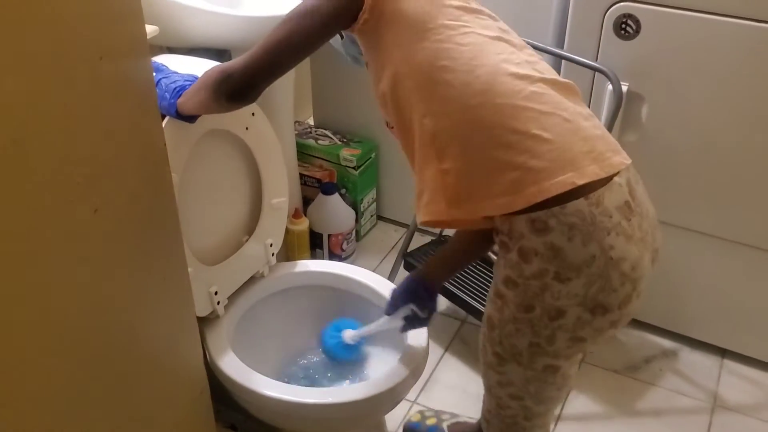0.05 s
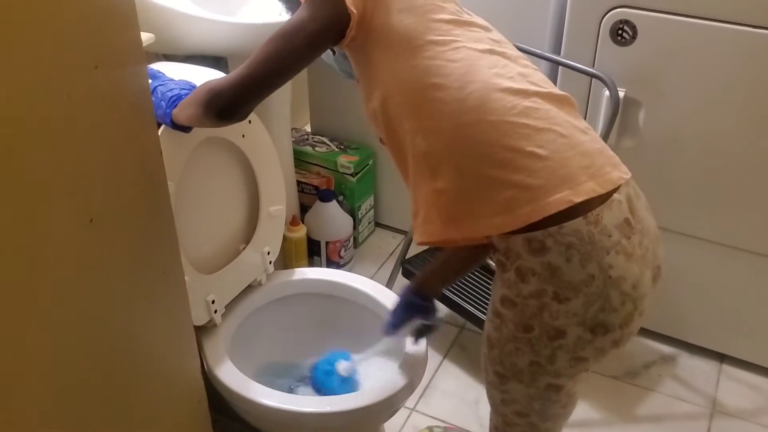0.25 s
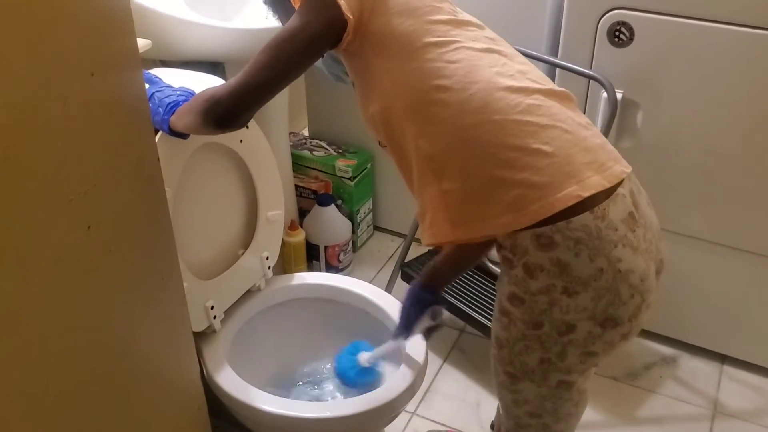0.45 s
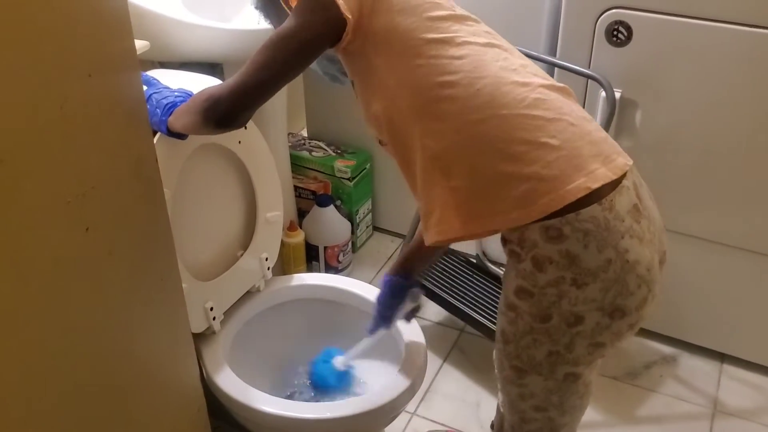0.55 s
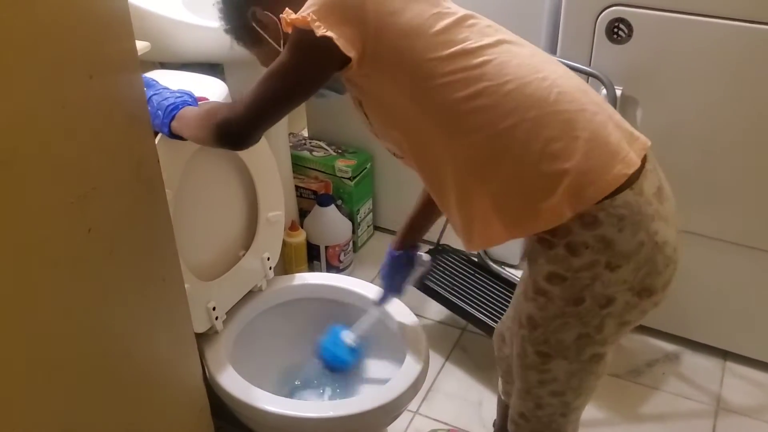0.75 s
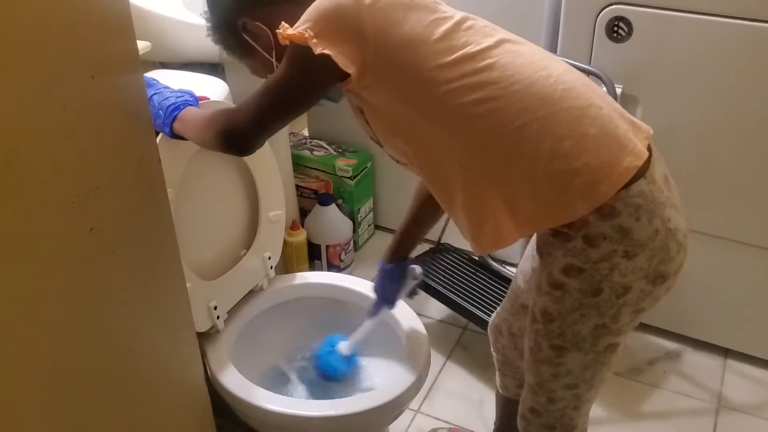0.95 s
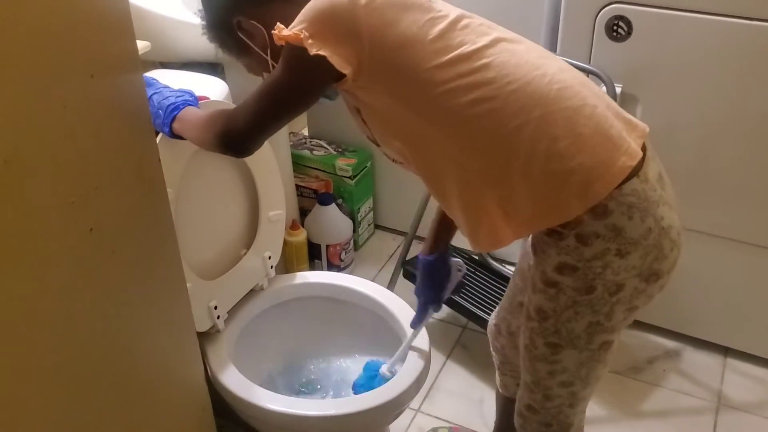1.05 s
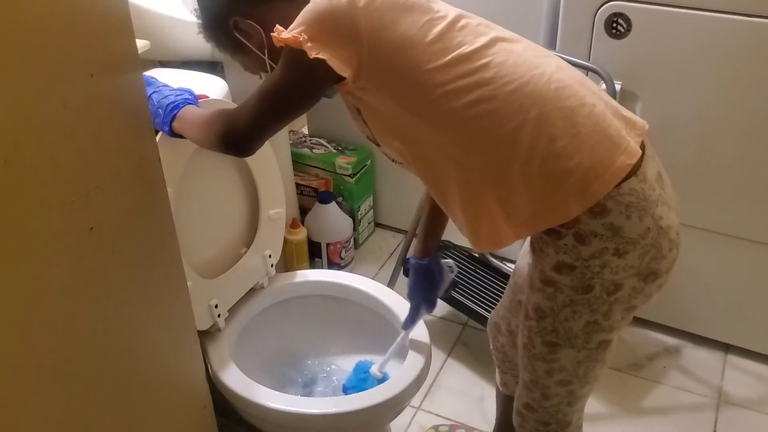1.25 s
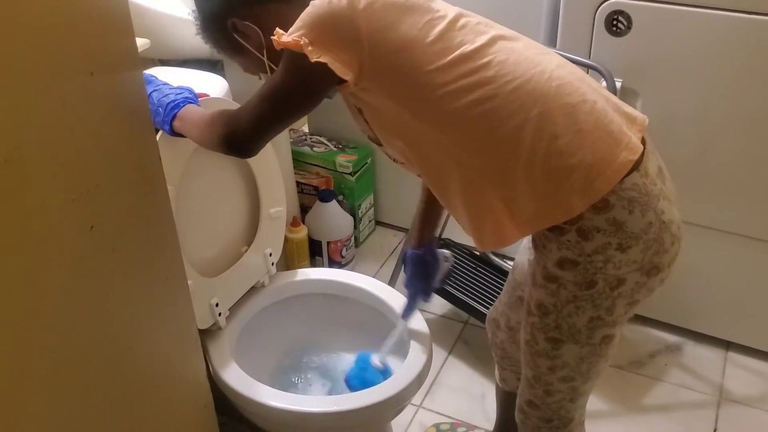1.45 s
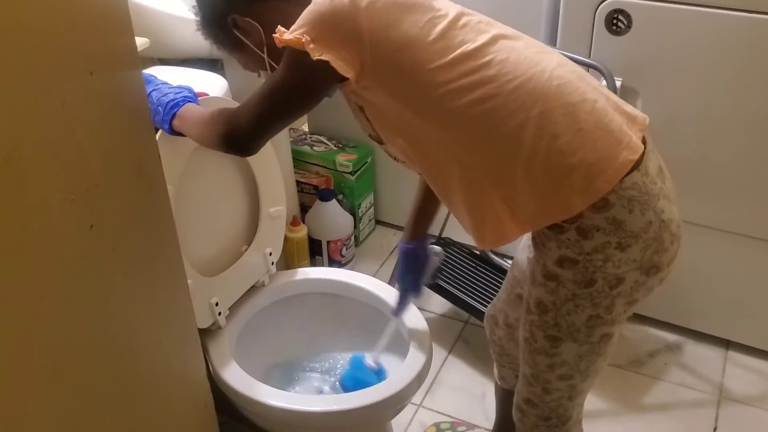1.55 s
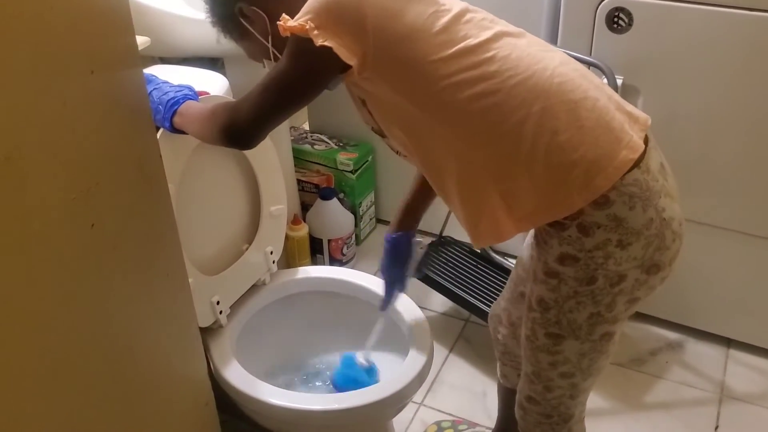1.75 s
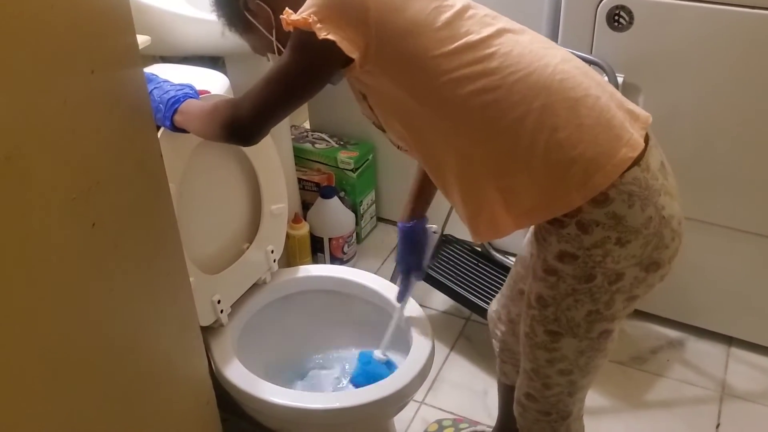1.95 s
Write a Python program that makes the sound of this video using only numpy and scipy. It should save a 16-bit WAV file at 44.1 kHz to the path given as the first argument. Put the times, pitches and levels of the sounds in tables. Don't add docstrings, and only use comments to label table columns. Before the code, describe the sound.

A stiff brush scrubs a wet toilet bowl, bristles hissing and scraping over lapping water and faint room rumble. The stem glances off the rim at 0.2 s; a sharp, loud knock rings the porcelain at 0.4 s. Duller hollow knocks, ticks and a plop come near 0.86 and 1.1 s. Longer, steadier strokes continue to 2 s, with light taps around 1.55 and drops near 1.73 s. Close, with short hard-walled reflections.

```python
import sys
import numpy as np
from scipy import signal
from scipy.fft import rfft, irfft, next_fast_len
from scipy.io import wavfile

SR = 44100
rng = np.random.default_rng(int(sys.argv[2]) if len(sys.argv) > 2 else 0)


def materialize(psi):
    bounded = np.clip(np.atleast_2d(psi).T, -1, 1)
    quanta = np.round(bounded * 32767).astype(np.int16)
    wavfile.write(sys.argv[1], SR, quanta)


def rack_gain(trim_db):
    fader = np.asarray(trim_db, float)
    return 10 ** (fader / 20)


N = 88200

# pitch_hz, level_db
STEADY_SPECTRUM = [(20, -20), (58, 3), (120, -4.5), (200, -10.5), (400, -20.5), (900, -26), (1500, -8.5),
                   (2600, -2.5), (5500, -11), (7800, -23), (12000, -20.5), (15000, -21)]
# start_s, level_db, pitch_hz, length_cycles
THUMPS = [(.12, -61, 187.5, 160), (.24, -49, 183.5, 60), (.26, -40.5, 65, 15.3), (0.329, -47.5, 176, 29),
          (0.41, -39, 187.4, 25.7), (0.43, -33, 52, 8.4), (0.588, -39.5, 160, 8.9), (.62, -44, 63.5, 8.9),
          (0.644, -41.5, 313, 5.8), (.76, -56.5, 97.4, 40), (0.861, -45.5, 83.4, 14),
          (0.862, -32, 191, 11.4), (.862, -35, 335, 18), (.89, -47, 260, 17.5), (1.099, -44.5, 56.4, 15.4),
          (1.229, -51, 57.4, 11)]
# time_s, level_db
WASH = [(0, -58), (.1, -69), (.3, -65.5), (.56, -60.5), (.76, -70), (.82, -86), (.9, -61), (1.02, -64),
        (1.15, -59.5), (1.33, -64), (1.38, -82), (1.53, -78), (1.6, -61), (1.7, -80), (1.78, -75), (2, -68)]
# start_s, level_db, pitch_hz, length_cycles
DROPS = [(.006, -41, 810, 35), (.02, -37, 980, 13), (.581, -40.5, 1120, 19), (.861, -29, 1133, 23),
         (1.049, -39, 1140, 17), (1.049, -44.5, 780, 15), (1.285, -38, 1540, 26), (1.733, -39, 1135, 25),
         (1.734, -32.5, 1530, 18), (1.745, -48, 710, 11), (1.77, -55, 710, 39), (1.941, -43, 1165, 30)]
# start_s, level_db, pitch_hz, length_cycles
TICKS = [(.229, -33.5, 1044, 133), (0.2264, -29.5, 1160, 22), (0.2386, -18, 2510, 21),
         (.306, -38, 4250, 99), (0.4028, -6.5, 2570, 11), (.4023, -17.5, 3900, 25), (0.4055, -17, 2740, 24),
         (0.411, -27, 3060, 26), (.4225, -25, 2290, 17), (0.434, -19, 2800, 16), (0.506, -42, 2160, 20),
         (.6815, -34.5, 3970, 28), (.683, -34, 2190, 20), (.835, -33, 2260, 39), (.861, -31, 434, 19),
         (.8587, -25.5, 2120, 30), (0.86, -24, 3220, 26), (.8685, -21.5, 2290, 19), (.909, -32, 3130, 27),
         (0.922, -31.5, 2540, 20), (.9545, -32.5, 2040, 43), (1.063, -33, 1950, 25),
         (1.0908, -23.5, 2800, 38), (1.0897, -21, 1950, 16.4), (1.0982, -17, 3250, 12.4),
         (1.1013, -27, 4260, 20), (1.117, -34, 2520, 16), (1.139, -39, 486, 21), (1.2753, -32, 2090, 32),
         (1.553, -42, 484, 31), (1.547, -31, 2960, 19), (1.5568, -33, 2570, 41), (1.558, -36, 2040, 39),
         (1.559, -38, 1580, 29), (1.572, -26.5, 2740, 15), (1.729, -30, 3640, 25), (1.8371, -38, 1840, 24)]
# start_s, length_s, level_db
SCUFFS = [
    (0.687, 0.029, -44),
    (0.868, 0.03, -42),
]
# start_s, contact_s, level_db
GLANCES = [
    (0.2243, 0.0075, -23.5),
    (.2298, 0.0045, -22),
    (0.2387, 0.0017, -24),
]
# start_s, contact_s, ring_db, clack_db, hollow_db
KNOCKS = [(.005, 0.0078, -49.5, -57, -62), (0.226, 0.01, -33, -30, -44), (0.241, 0.0025, -44, -35, -38.5),
          (0.311, 0.0062, -62, -50, -59), (0.402, 0.0011, -35.5, -28, -54), (.404, 0.0067, -23, -49, -38),
          (0.428, 0.0031, -33.5, -39, -42), (0.682, 0.018, -73, -48, -70), (0.833, 0.0099, -74, -56, -82),
          (0.851, 0.021, -56, -45, -33), (.885, 0.019, -66, -48, -50), (1.063, 0.0035, -58, -56, -80),
          (1.08, 0.025, -42.5, -36, -32.5), (1.14, .012, -71, -57, -46), (1.548, 0.018, -51.5, -49, -48),
          (1.731, 0.01, -72, -43.5, -78)]
# pitch_hz, level_db, t60_s
RING_MODES = [(782, -10, .12), (1032, -9, .09), (1046, -3, .15), (1075, -11, .06), (1164, -6, .1),
              (1437, -12, .06)]
# pitch_hz, level_db, t60_s
CLACK_MODES = [(2054, -7, .06), (2192, -5, .06), (2292, -2, .08), (2425, 0, .07), (2558, -4, .07),
               (2690, -3, .05), (2884, -3, .1), (3160, -7, .06), (3540, -11, .05), (3755, -13, .04),
               (4050, -11, .03), (4550, -19, .03)]
# pitch_hz, level_db, t60_s
HOLLOW_MODES = [(190, -22, .1), (340, -22, .05), (445, -9, .04), (478, 0, .065), (510, -11, .04)]
# low_hz, high_hz, level_db, decay_s
ROUGH_TAILS = [
    (600, 1900, -15, .016),
    (1500, 4500, -3, .016),
    (420, 600, -17, .012),
]
# middle_s, half_length_s, hiss_db, scrape_db
STROKES = [(0.005, 0.029, -58, -47), (0.085, 0.028, -53.5, -45.5), (0.143, 0.036, -52, -55),
           (0.214, 0.02, -38.5, -43.5), (0.28, 0.038, -45, -38.5), (0.367, 0.017, -48, -52),
           (0.404, 0.01, -36, -43.5), (0.427, 0.018, -44, -35.5), (0.513, 0.022, -40, -41),
           (0.609, 0.016, -48, -54.5), (0.634, .03, -60, -56), (0.691, 0.015, -56, -44),
           (0.778, 0.02, -38.5, -43), (0.852, 0.026, -35.5, -37.5), (0.92, 0.021, -39.5, -40),
           (0.975, 0.028, -45.5, -40), (1.06, 0.04, -44, -41.5), (1.095, 0.026, -42.5, -39.5),
           (1.164, 0.04, -41.5, -38), (1.209, 0.048, -42.5, -45), (1.273, 0.027, -44.5, -42),
           (1.43, 0.029, -43.5, -44), (1.526, 0.045, -42, -45), (1.635, 0.046, -46.5, -45.5),
           (1.726, 0.032, -42.5, -43.5), (1.851, 0.032, -48, -46), (1.945, 0.036, -46, -44.5)]
# pitch_hz, level_db (per Hz)
HISS_SPECTRUM = [(2350, -13), (4000, -3), (5510, -2.5), (8040, -10.5), (9880, -11), (10700, 0.5),
                 (12300, -1.5), (13900, -7.5), (15700, -8.5)]
# pitch_hz, level_db (per Hz)
SCRAPE_SPECTRUM = [(530, -46), (900, -14), (1190, -12), (1850, -3.5), (2070, -2), (2240, 1), (2820, 0),
                   (3400, -1.5), (7000, -19), (9100, -37), (15400, -120)]
# pitch_hz, likeness (0 to 1)
LIKENESS = [(60, .94), (300, .93), (1000, .6), (2500, .4), (4500, .1), (8000, .76), (13000, .7)]
# pitch_hz, lead_rad
PORT_LEAD = [(300, 0.0), (520, .1), (950, 1.6), (1550, 1.3), (2300, 1.5), (3500, 1.4), (6500, -1.0),
             (8000, .0)]
# pitch_hz, level_db
PORT_LEAN = [(60, 2), (180, -2.5), (550, 1.5), (1650, 6.5), (4970, -0.5), (15000, 1.5)]


def rms_one(x):
    return x / np.sqrt(np.mean(x ** 2) + 1e-20)


def at_hz(points, hz):
    table_hz, value = np.transpose(points)
    return np.interp(np.log(hz + 1), np.log(table_hz + 1), value)


def band_pass(x, low_hz, high_hz, order=2):
    return signal.sosfilt(signal.butter(order, [low_hz, high_hz], "band", fs=SR, output="sos"), x)


def high_pass(x, cut_hz, order):
    return signal.sosfilt(signal.butter(order, cut_hz, "high", fs=SR, output="sos"), x)


def drift(rate_hz):
    r = np.exp(-80 * np.pi * rate_hz / SR)
    noise = rng.standard_normal(N // 40 + 2002)
    slow = signal.lfilter([1], [1, -2 * r, r * r], noise)[2000:]
    return np.interp(np.arange(N) / 40, np.arange(len(slow)), rms_one(slow))


def ring(x, hz, t60):
    r, w = rack_gain(-60 / (t60 * SR)), 2 * np.pi * hz / SR
    return signal.lfilter([0, np.sin(w)], [1, -2 * r * np.cos(w), r * r], x + 1e-18)


def coloured(source, spectrum, patchy_db, step):
    out = 0
    edges = spectrum[0][0] * 2 ** np.arange(0, 11, step)
    edges = edges[edges < min(spectrum[-1][0] * 2 ** step, 19000)]
    for k, (low, high) in enumerate(zip(edges, edges[1:])):
        hz = np.sqrt(low * high)
        mid, side = band_pass(source[k % 2], low, high)
        alike = np.clip(at_hz(LIKENESS, hz), 0, 1)
        gain = rack_gain(at_hz(spectrum, hz) + patchy_db * drift(17.0))
        out = out + gain * (np.sqrt(1 + alike) * mid + np.sqrt(1 - alike) * side * [[1], [-1]])
    return rms_one(out)


def blips(rows, rise):
    out = np.zeros(N)
    for s, db, hz, cycles in rows:
        span = slice(int(s * SR), min(int((s + 2 * cycles / hz) * SR), N))
        turns = np.maximum(np.arange(span.start, span.stop) / SR - s, 0) * hz
        shape = (1 - np.exp(-turns / 1.28)) * rack_gain(-60 * turns / cycles)
        bend = 1 + rise * np.minimum(turns / cycles, 1)
        out[span] += 2 * rack_gain(db) * shape * np.sin(2 * np.pi * turns * bend)
    return out


def bathroom(x):
    t60_s, wall_cut_hz = 0.18, 2800
    size = next_fast_len(N + SR)
    w = 2 * np.pi * np.arange(size // 2 + 1) / size
    out = np.zeros((2, len(w)), complex)
    dull = 1 / (1 + 1j * w * SR / (2 * np.pi * wall_cut_hz))
    for k, lag in enumerate(rng.uniform(.008, .03, 16) * SR):
        loop = rack_gain(-60 * lag / SR / t60_s) * dull * np.exp(-1j * w * lag)
        out[k % 2] += (-1) ** (k // 2) * loop / (1 - loop)
    return irfft(out * rfft(x, size), size)[:, :N]


def steady_noise():
    noise = rng.standard_normal((2, 2, N))
    return rack_gain(-50.5) * coloured(noise, STEADY_SPECTRUM, patchy_db=2.2, step=.5)


def floor_thumps():
    return blips(THUMPS, rise=0)


def wash():
    s, db = np.transpose(WASH)
    noise = rng.standard_normal(N) + 0.66 * rng.standard_normal((2, N))
    lapping = band_pass(noise, 454, 1260, order=3)
    level_db = np.interp(np.arange(N) / SR, s, db) + 2.8 * drift(19.0)
    return rack_gain(level_db) * rms_one(lapping)


def drops():
    return blips(DROPS, rise=0.037)


def ticks():
    return blips(TICKS, rise=0)


def scuffs():
    s, length, db = np.transpose(SCUFFS)[:, :, None]
    since = np.arange(N) / SR - s
    shape = np.sum(rack_gain(db) * (since > 0) * np.exp(-np.abs(since / length) ** 4), axis=0)
    return shape * rms_one(band_pass(rng.standard_normal(N), 300, 1800))


def glances():
    contacts = np.zeros(N)
    for s, length, db in GLANCES:
        rattle = rng.standard_normal(SR // 50) * (np.arange(SR // 50) < length * SR)
        start = int(s * SR)
        contacts[start:start + len(rattle)] += rack_gain(db) * rattle / np.sqrt(length * SR)
    out = np.zeros(N)
    for hz, db, t60 in CLACK_MODES[1:5]:
        rung = ring(contacts, hz, t60)
        out += rack_gain(db + GLANCES[-1][2]) * rung / np.abs(rung).max()
    return out


def knocks():
    mode_luck_db, crack_db, crack_s = 2, 5, 0.00067
    out, t = np.zeros(N + SR), np.arange(SR // 3) / SR
    for s, length, *levels_db in KNOCKS:
        attack = np.minimum(t / length, 1)
        since = np.maximum(t - length, 0)
        contact = rng.standard_normal(len(t)) * np.sin(np.pi * attack)
        crack = rng.standard_normal(len(t)) * attack * np.exp(-since / crack_s)
        sound = rack_gain(levels_db[1] + crack_db) * band_pass(crack, 1600, 4500)
        families = zip((RING_MODES, CLACK_MODES, HOLLOW_MODES), levels_db, ROUGH_TAILS)
        for modes, level_db, (low, high, rough_db, decay) in families:
            rough = rms_one(band_pass(rng.standard_normal(len(t)), low, high))
            sound += rack_gain(level_db + rough_db) * rough * attack * np.exp(-since / decay)
            for hz, db, t60 in modes:
                rung = ring(ring(contact, hz, t60 / 8), hz, t60)
                luck_db = mode_luck_db * rng.standard_normal()
                sound += rack_gain(level_db + db + luck_db) * rung / np.abs(rung).max()
        start = int(s * SR)
        out[start:start + len(t)] += sound
    return high_pass(out[:N], 170, order=2)


def flicks():
    flicks_per_s, spread_db = 6500, -1.5
    shape = (2, 2, N)
    let_go = rng.random(shape) < flicks_per_s / SR
    size = rack_gain(spread_db * np.minimum(rng.exponential(1, shape), 4))
    return let_go * rng.standard_normal(shape) * size


def brush():
    edge_db = 5
    rise_share = 0.87
    judder_db, judder_hz = 1.62, 35
    s, half, hiss_db, scrape_db = np.transpose(STROKES)[:, :, None]
    away = (np.arange(N) / SR - s) / half
    swell_db = -edge_db * np.where(away < 0, away / rise_share, away * rise_share) ** 2
    hiss = np.sqrt(np.sum(rack_gain(hiss_db + swell_db) ** 2, axis=0))
    scrape = np.sqrt(np.sum(rack_gain(scrape_db + swell_db) ** 2, axis=0))
    grains = flicks()
    glaze = sum(rack_gain(db) * ring(grains[0], hz, 0.11) for hz, db, _ in CLACK_MODES)
    body = coloured(grains, SCRAPE_SPECTRUM[:-1], patchy_db=0.47, step=1 / 3)
    body = high_pass(body + rack_gain(-10) * rms_one(glaze), 1150, order=4)
    tips = coloured(flicks(), HISS_SPECTRUM, patchy_db=2.0, step=1 / 4)
    return rack_gain(judder_db * drift(judder_hz)) * (hiss * tips + scrape * body)


def scene():
    hits = drops() + ticks() + scuffs() + glances() + knocks()
    background = steady_noise() + floor_thumps() + wash()
    return background + rack_gain(-10.5) * bathroom(hits) + hits + brush()


def roll_off(x):
    return signal.sosfilt(signal.butter(12, 15860, fs=SR, output="sos"), x)


def record(dry):
    size = next_fast_len(N + SR // 10)
    hz = np.arange(size // 2 + 1) * SR / size
    half_difference = rack_gain(at_hz(PORT_LEAN, hz) / 2) * np.exp(.5j * at_hz(PORT_LEAD, hz))
    ports = half_difference ** np.array([[1], [-1]])
    mix = irfft(rfft(dry, size) * ports * (hz < 15865), size)[:, :N]
    return roll_off(mix)


dry = scene()
out = record(dry)
materialize(out)
```